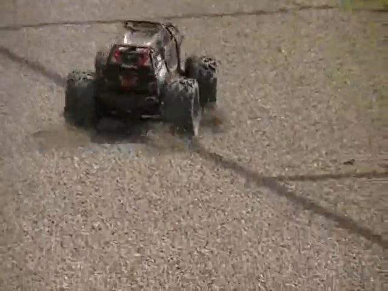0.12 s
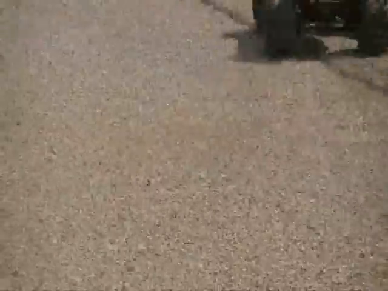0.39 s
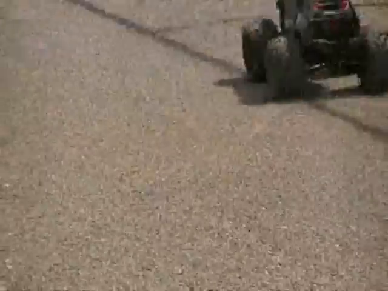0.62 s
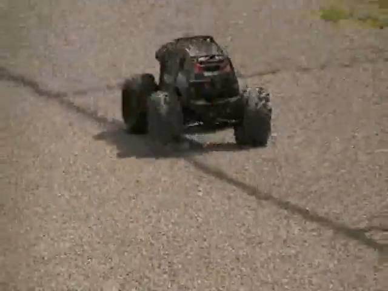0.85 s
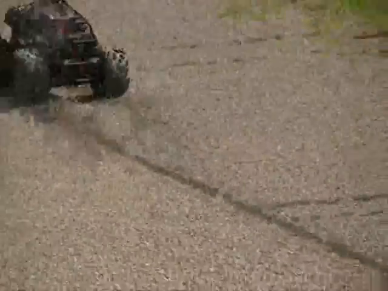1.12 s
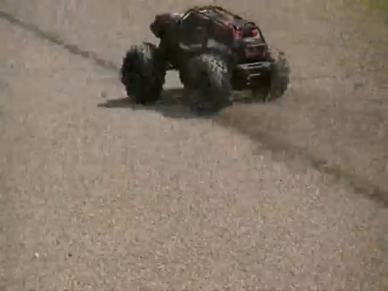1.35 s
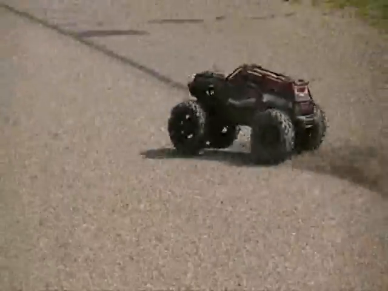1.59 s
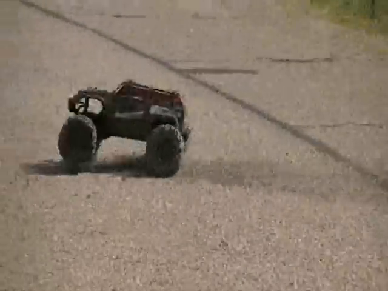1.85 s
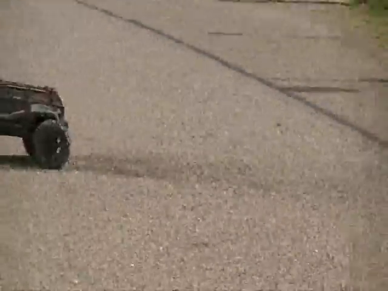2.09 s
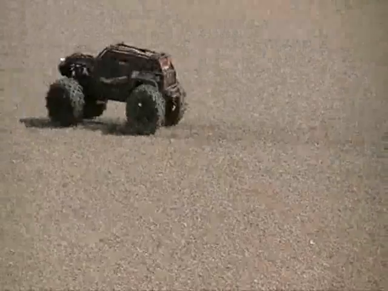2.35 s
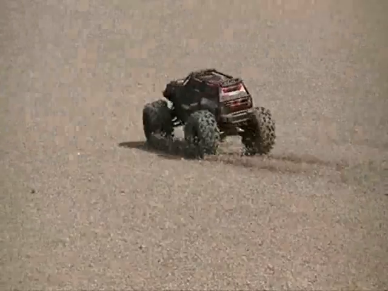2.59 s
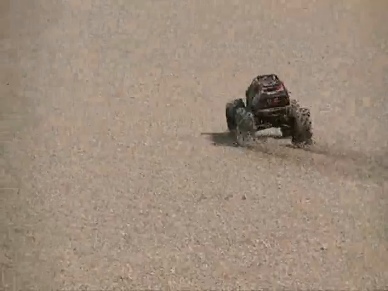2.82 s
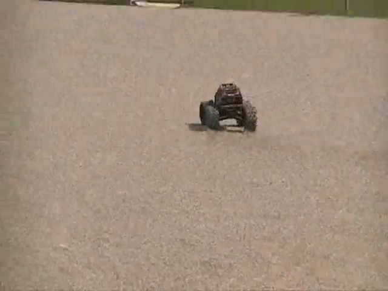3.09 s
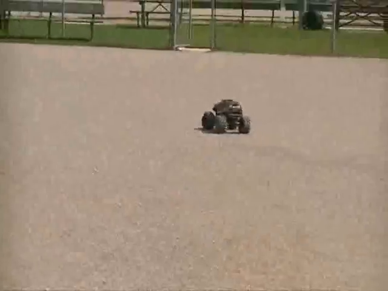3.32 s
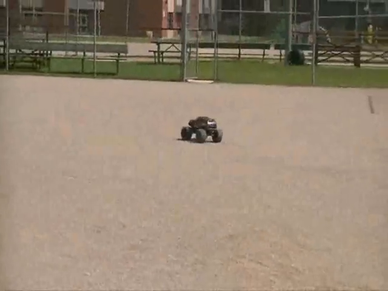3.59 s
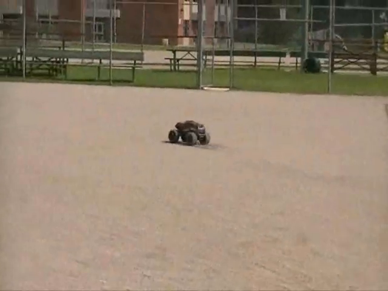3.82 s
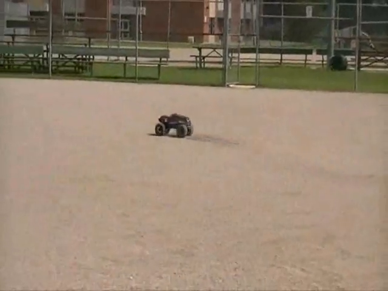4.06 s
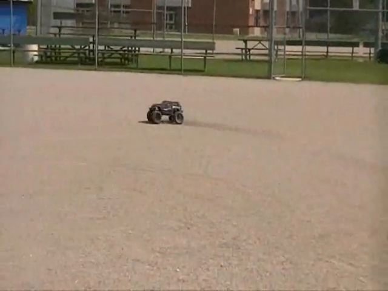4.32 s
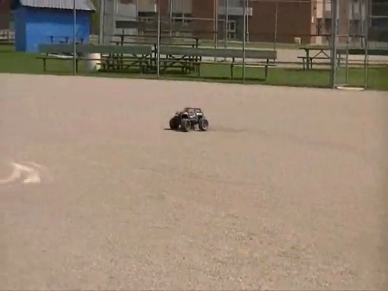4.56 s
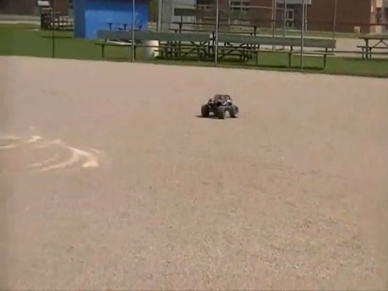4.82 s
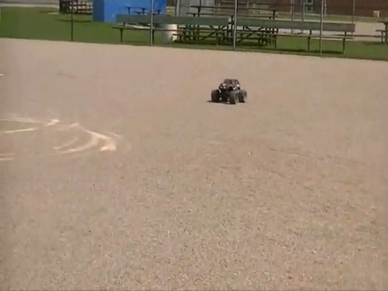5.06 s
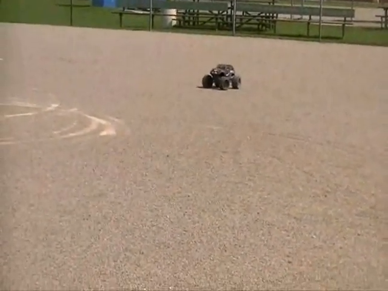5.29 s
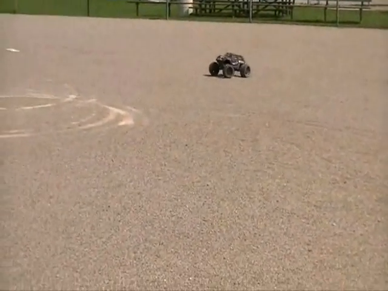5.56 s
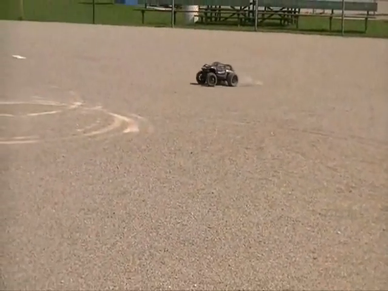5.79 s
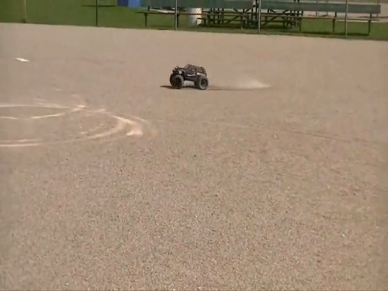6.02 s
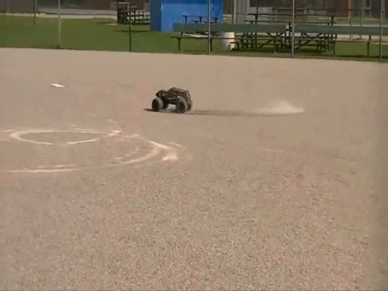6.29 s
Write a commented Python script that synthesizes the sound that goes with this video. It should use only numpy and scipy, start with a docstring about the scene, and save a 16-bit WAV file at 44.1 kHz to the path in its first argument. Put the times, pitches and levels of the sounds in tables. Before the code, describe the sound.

Outdoors on gravel, centred mono, with faint town hum and soft low wind. Two or three thin cricket chirps open the scene. At 0.1 s a remote-controlled truck spurts: its gear whine leaps upward over sudden tyre crunch, then drops by 0.45 s into quiet coasting, with stone ticks near 0.6 s and small thuds around 0.8 s. At 1 s it pulls away again, the whine stepping up to a bright, buzzing scream, loudest and closest near 2 s. At 2.9 s it eases off; a sharp stone strike lands at 3.1 s and the whine throbs lower, with chirps between. Another spurt runs 3.9-4.3 s with soft bumps, then slows and fades to sparse crunch, chirps and faint whistle by 5.5 s. From 5.65 s it accelerates again with growling body rattles, gritty spray and high wavering whine, cut off still running at 6.4 s.

```python
"""Cricket chirps over a distant town hum, then a remote-controlled truck spurts and coasts over gravel.
It pulls away again at about 1 s, is nearest at 2 s, then leaves, with spurts from 3.9 and 5.6 s.
Gear teeth make a harmonic whine that throbs once per turn of the large gear. Clicks coloured by filters
make the crunch and spray of the tyres; noise bursts make stone strikes and, near 5.7 s, growling body
rattles; sines make thuds. Gusts buffet the microphone now and then; both channels are the same."""
import sys
import numpy as np
from scipy import signal
from scipy.fft import rfft, irfft
from scipy.io import wavfile
from scipy.ndimage import uniform_filter1d

SR = 44100
rng = np.random.default_rng(int(sys.argv[2]) if len(sys.argv) > 2 else 0)


def int16_out(signal):
    """Quantize to a 16-bit WAV file."""
    q = np.round(np.clip(np.atleast_2d(signal).T, -1, 1) * 32767)
    wavfile.write(sys.argv[1], SR, q.astype(np.int16))


def gain_from_decibels(decibels):
    """Convert decibel values to linear amplitude factors."""
    exponent = np.asarray(decibels, float) / 20
    return 10 ** exponent


N = 282681
T = np.arange(N) / SR

# Motor. Each row: time in seconds, tooth rate in Hz, whine of the upper harmonics in dB.
MOTOR = [(0, 1310, -85), (.11, 1340, -69), (.165, 1800, -50), (.21, 2140, -57), (.27, 2266, -57),
         (.297, 2800, -50), (.32, 2570, -37), (.36, 2520, -45), (.4, 2125, -55), (.42, 1680, -64),
         (.5, 1694, -66), (.9, 1560, -75), (.98, 2380, -39), (1.02, 2110, -58), (1.058, 2182, -58),
         (1.095, 2890, -33), (1.135, 2535, -46), (1.16, 3450, -42), (1.2, 2876, -65), (1.3, 3584, -32),
         (1.34, 3300, -39), (1.385, 3690, -35), (1.41, 3550, -30), (1.44, 3750, -28), (1.54, 3640, -30),
         (1.58, 3870, -28.5), (1.65, 3750, -32.5), (1.9, 3960, -33.5), (1.93, 3740, -29),
         (1.965, 4155, -28.5), (2.01, 3790, -31), (2.06, 3826, -32), (2.11, 3490, -34), (2.28, 3500, -36.5),
         (2.42, 3790, -33), (2.62, 3994, -36), (2.85, 3615, -39.5), (2.9, 2776, -49), (3.08, 2574, -48),
         (3.17, 2450, -36), (3.36, 2305, -48.5), (3.47, 2290, -39), (3.65, 2268, -42.5), (3.69, 2280, -64),
         (3.85, 2290, -67), (3.89, 2960, -54), (3.92, 3330, -42), (4.04, 3360, -45), (4.11, 3674, -37),
         (4.21, 3810, -40), (4.25, 3620, -38), (4.3, 2686, -52), (4.37, 2530, -44.5), (4.44, 2383, -44),
         (4.55, 2206, -54), (4.7, 1815, -43), (4.9, 1632, -68), (5.55, 1520, -76), (5.655, 2290, -58),
         (5.69, 2300, -58), (5.72, 2595, -43), (5.755, 2630, -43), (5.77, 2885, -62), (5.79, 3350, -34),
         (5.825, 3084, -52), (5.86, 3430, -39), (5.9, 3390, -43), (5.93, 3840, -38), (6.05, 3813, -37),
         (6.14, 4087, -35.5), (6.23, 3546, -44), (6.33, 4116, -37.5), (6.37, 3920, -40), (6.41, 3940, -43)]
# Trigger pulls. Each row: on in seconds, off in seconds.
TRIGGER_PULLS = [(.11, 0.62), (.97, 2.87), (3.86, 4.28), (5.64, 7.05)]
# How hard the tyres work the gravel. Each row: time in seconds, level in dB.
TYRE_WORK = [(0, -76), (.07, -54), (.16, -29.5), (.36, -30.5), (.46, -38), (.52, -43), (.59, -40.5),
             (.61, -45), (.71, -48), (.75, -43.5), (.87, -50), (.96, -43), (1.02, -31.5), (2, -32.5),
             (2.36, -36), (2.6, -33), (2.87, -35), (3.11, -37), (3.21, -42), (3.82, -43), (3.93, -35.5),
             (4.12, -35.5), (4.37, -37.5), (4.96, -41.5), (5.18, -50), (5.44, -53), (5.62, -46),
             (5.67, -36), (6, -34), (6.25, -34.5), (6.41, -34)]
# Distance of the truck, which dulls hiss and spray. Each row: time in seconds, distance in metres.
DISTANCE = [(0, 5.6), (2, 1.5), (3.3, 7.66), (5, 10.3), (6.41, 9.7)]

# Upper tooth harmonics. Each row: multiple of the tooth rate, relative level in dB.
TOOTH_HARMONICS = [(2, 0), (3, 0), (4, -4), (5, -9)]
# Gearbox casing, favouring harmonics near its main resonance. Each row: frequency in Hz, gain in dB.
CASING = [(3000, -30), (5800, -24), (6700, -4), (7500, 0), (8300, -3), (9200, -14), (11500, -16),
          (13000, -22), (15500, -16)]
# How well the body radiates the tooth tone. Each row: frequency in Hz, gain in dB.
RADIATES_TOOTH = [(1200, -6), (1550, 3), (1700, -5), (1850, 0), (2000, -11), (2130, -6), (2300, -10),
                  (2600, -14.5), (2800, -10), (3080, -22), (3250, -11), (3550, -16), (3750, -19.5),
                  (3900, -21.5), (4300, -22)]
# How well it radiates the second gear pair. Each row: frequency in Hz, gain in dB.
RADIATES_SECOND = [(300, -27), (500, -38), (585, -2), (680, -22), (850, -18), (930, -6), (1000, -8.5),
                   (1100, -9.5)]
# How well it radiates that pair's third harmonic. Each row: frequency in Hz, gain in dB.
RADIATES_OVERTONE = [(900, -25), (1450, -16), (1700, -7), (1900, -24), (2100, -5.5), (2300, -10),
                     (2480, -7), (2600, -20), (2800, -20), (3000, -19), (3400, -19)]
# The tooth tone sings out. Each row: centre in seconds, added peak in dB, half length in seconds.
TOOTH_SINGS = [(.135, -36, .01), (.165, -38, 0.01), (.21, -26, 0.01), (.24, -29, 0.009), (.33, -33, 0.039),
               (.405, -30.5, .015), (.99, -35, 0.011), (1.04, -39, 0.025), (1.095, -38, 0.011),
               (1.19, -39, 0.03), (1.29, -47, 0.038), (1.4, -35.5, 0.047), (1.53, -39, 0.042),
               (1.84, -39.5, 0.033), (1.985, -40, 0.018), (2.25, -43, 0.14), (2.58, -43, 0.083),
               (3.9, -45, 0.038), (4.01, -48, 0.024), (4.2, -53, 0.062), (5.655, -39, 0.009),
               (5.74, -35, 0.025), (5.825, -36, 0.016), (5.87, -60, 0.014), (6, -44, 0.084)]
# The second pair swells as tyres grip. Each row: centre in seconds, added peak in dB, half length in seconds.
TYRE_GRIPS = [(1.42, -42, 0.041), (1.7, -41.5, 0.3), (2.02, -38.5, .08), (2.25, -48, 0.046),
              (2.47, -40, 0.11), (6.02, -53, 0.054), (6.15, -37.5, .04), (6.33, -37, .04)]

# Modes of the plastic shell. Each row: frequency in Hz, width in Hz, level under the crunch in dB.
SHELL_MODES = [(600, 185, 2), (1094, 180, -8), (1267, 170, -8.5), (1706, 215, -1), (2220, 220, -6),
               (2410, 320, -26), (2830, 57, -13.5)]
# Colour of the gravel crunch. Each row: frequency in Hz, relative level in dB per Hz.
CRUNCH_COLOUR = [(200, 2.5), (400, -1), (1000, -0.5), (2500, -6.5), (4000, -22), (8000, -27.5)]
# Colour of the hiss. Each row: frequency in Hz, relative level in dB per Hz.
HISS_COLOUR = [(2500, 5.5), (3500, 5), (5000, 6.5), (7500, 5), (9000, 6), (11000, 4), (15000, -5)]
# Colour of the grit spray. Each row: frequency in Hz, relative level in dB per Hz.
SPRAY_COLOUR = [(3000, -45), (6500, -5), (8500, -4), (10500, 0), (12000, -4), (14000, -8), (16000, -11)]
# Colour of the chassis rumble. Each row: frequency in Hz, relative level in dB per Hz.
RUMBLE_COLOUR = [(50, -33), (90, -9.5), (130, -5), (200, 1), (320, 0.5), (500, -39)]
# Grit off spinning tyres. Each row: centre in seconds, added peak in dB, half length in seconds.
GRIT_SPURTS = [(.16, -50, 0.016), (.36, -63, 0.027), (.765, -56, 0.015), (1, -33.5, 0.013), (1.5, -41, .02),
               (2.65, -45, 0.03), (2.77, -41, 0.024), (3.11, -52, 0.024), (3.59, -49, 0.1),
               (3.93, -47, 0.026), (4.13, -49, 0.041), (5.2, -56, 0.024), (5.31, -51.5, 0.042),
               (5.67, -38.5, 0.038), (5.83, -38.5, 0.074), (6, -40, 0.021), (6.18, -43, 0.035),
               (6.39, -61, .03)]
# Wheels jolting over ruts. Each row: centre in seconds, added peak in dB, half length in seconds.
WHEEL_JOLTS = [(0, -59, .03), (.165, -42, 0.029), (.46, -49, 0.025), (.75, -58, .03), (.84, -42, 0.012),
               (2.79, -49.5, 0.081), (3.03, -39.5, 0.036), (4.03, -51, 0.047), (5.37, -48, 0.019),
               (5.55, -49, 0.047), (5.77, -44, 0.056), (6, -53, 0.058), (6.34, -42.5, 0.037)]
# Stone strikes, and at 5.68-5.83 s narrow growling rattles of the body, before the shell rings.
# Each row: start in seconds, peak in dB, centre in Hz, 60 dB decay of the raw noise in seconds,
# half-width in octaves.
STRIKES_AND_RATTLES = [(0.5728, -22, 2750, 0.016, 0.85), (0.59, -17, 3300, 0.01, 0.93),
                       (.985, -24.5, 2450, 0.015, 1.3), (2.864, -16.5, 5500, 0.02, 0.96),
                       (2.889, -23, 4980, .02, 0.77), (3.1105, -10.5, 1710, 0.024, 1.48),
                       (4.486, -28, 6500, .02, 0.48), (5.128, -32, 3965, 0.019, 0.65),
                       (5.685, -31, 1798, 0.053, 0.12), (5.784, -36, 1760, 0.09, 0.064),
                       (5.809, -29.5, 1770, 0.094, 0.24), (5.825, -30, 1590, 0.071, 0.056),
                       (6.19, -19, 6500, 0.03, 1.3), (6.308, -28, 5280, 0.019, .4),
                       (6.389, -24, 5570, 0.021, .4)]
# Chassis thuds; the envelope tops out about 6 dB below the level.
# Each row: start in seconds, level in dB, frequency in Hz.
CHASSIS_THUDS = [(0.76, -35.5, 118), (0.826, -30, 199), (2.996, -26, 204), (3.975, -26, 175),
                 (4.025, -29, 110), (5.372, -30.5, 189), (5.55, -37, 203)]

# Thin high whistle while the truck is slow. Each row: start in seconds, length in seconds, level in dB.
SLOW_WHISTLES = [(0, .15, -60), (.6, .1, -52), (.74, .07, -52), (4.93, .2, -60), (5.493, .18, -61)]
# Cricket. Each row: start in seconds, peak in dB, mid pitch in Hz.
CRICKET_CHIRPS = [(0.0468, -61, 4380), (0.0765, -44, 4600), (0.1156, -43, 4710), (3.095, -52, 4640),
                  (3.1388, -45, 4720), (3.4061, -49, 4550), (3.4423, -46, 4680), (4.2777, -45, 4630),
                  (4.8443, -51, 4510), (4.876, -48, 4580), (4.916, -48, 4650), (5.257, -47.5, 4590),
                  (5.299, -45, 4620)]
# Colour of wind on the microphone. Each row: frequency in Hz, relative level in dB per Hz.
WIND_COLOUR = [(18, 8), (40, 0), (70, 4), (100, -10)]
# Gusts on the microphone. Each row: centre in seconds, added peak in dB, half length in seconds.
WIND_GUSTS = [(.3, -68, .4), (1.02, -65, .15), (1.8, -58, .35), (2.7, -63, 0.23), (3.09, -68, .1),
              (4.1, -76, .3), (6.2, -65, .5)]
# Colour of the distant town. Each row: frequency in Hz, relative level in dB per Hz.
TOWN_COLOUR = [(18, -40), (30, -27.5), (133, -4), (225, -9.5), (897, -6.5), (6720, -24.5), (8500, -14),
               (9430, -30), (15500, -34)]

BIG_GEAR_TEETH, SMALL_GEAR_TEETH = 68, 23
SECOND_STAGE = .265  # tooth rate of the second gear pair over the first
SLACK_DRIVEN, SLACK_COASTING = .28, 1  # throb depth 0-1; coasting gears knock once a turn
THROTTLE_SLEW_S = 0.01
# layers over the tyre work: (driven dB, coasting dB)
TOOTH_DB, SECOND_DB, OVERTONE_DB = (-1, -12), (-8.5, -24), (1.5, -29)
HISS_DB, SPRAY_DB, RUMBLE_DB = (-2.5, -2.5), (-8, -2), (-14, -14)
SPURT_HISS_DB = -6.5  # hiss of a grit spurt against its spray
SPRAY_DB_PER_OCTAVE, FULL_SPEED_HZ = 6.5, 3800  # more spray with speed
HISS_LOSS_DB_PER_M, SPRAY_LOSS_DB_PER_M = 0.58, 2
WHISTLE_HZ, WHISTLE_RISE_HZ = 8700, 330
CALM_DB, TOWN_DB = -101, -52.5


def gears():
    """Tooth harmonics, shaken by slipping wheels and two eccentric gears; also returns the once-a-turn throb."""
    hz, upper_db = curves(MOTOR)
    first_db = over_work(TOOTH_DB) + shape_db(RADIATES_TOOTH, hz) + 4 * walk(60)
    first = gain_from_decibels(first_db) + swells(TOOTH_SINGS)
    second_db = over_work(SECOND_DB) + shape_db(RADIATES_SECOND, SECOND_STAGE * hz)
    overtone_db = over_work(OVERTONE_DB) + shape_db(RADIATES_OVERTONE, 3 * SECOND_STAGE * hz)

    hz = hz * (1 + .004 * walk(45) + .004 * walk(300))  # wheels slip
    teeth = np.cumsum(hz) / SR
    big = 2 * np.pi * teeth / BIG_GEAR_TEETH
    small = 2 * np.pi * teeth / SMALL_GEAR_TEETH
    slack = SLACK_COASTING + (SLACK_DRIVEN - SLACK_COASTING) * throttle()
    depth = np.clip(slack * (1 + 0.11 * walk(18)), 0, 1)
    throb = (1 + depth * np.cos(big + 0.05)) ** 1.2 / (1 + .8 * slack)

    # run-out of each gear swings the mesh phase and load
    phase = 2 * np.pi * teeth + 0.3 * np.sin(big) + 0.22 * np.sin(small)
    load = throb * (1 + 0.36 * np.cos(small))
    tone = first * gain_from_decibels(3.5 * walk(110)) * np.sin(phase)
    # each tooth lands a little early or late, which smears the upper harmonics into bands
    scatter = phase + .6 * walk(300) + .35 * walk(700)
    for k, db in TOOTH_HARMONICS:
        flicker_db = 3.3 * walk(150) + k * walk(30) * 0.5
        harmonic_db = upper_db + db + shape_db(CASING, k * hz) + flicker_db
        tone = tone + gain_from_decibels(harmonic_db) * np.sin(k * scatter)
    second = second_pair(SECOND_STAGE * phase, second_db, overtone_db)
    return np.sqrt(2) * (load * tone + second), throb


def second_pair(phase, second_db, overtone_db):
    """The slower gear pair: three harmonics of one wandering phase, louder as the tyres grip."""
    slow = phase + .7 * walk(90)
    tone = (gain_from_decibels(second_db) + swells(TYRE_GRIPS)) * gain_from_decibels(1.7 * walk(40)) * np.sin(slow)
    tone = tone + gain_from_decibels(overtone_db - 11.0 + 4.24 * walk(30)) * np.sin(2 * slow)
    return tone + gain_from_decibels(overtone_db + 1.8 * walk(60)) * np.sin(3 * slow)


def crunch(throb):
    """Rolling stones click against each other and ring the plastic shell."""
    work_db, = curves(TYRE_WORK)
    stones_rolling = grains(9000., 1.28)
    gravel = unit(colour(stones_rolling, CRUNCH_COLOUR) + shell(stones_rolling, patchy_db=1.5))
    return gravel * gain_from_decibels(work_db + 0.14 * walk(24.9)) * throb ** 0.065


def shell(x, patchy_db):
    """Modes of the plastic body; each one is rattled harder at its own moments."""
    out = 0
    for hz, width, db in SHELL_MODES:
        mode = unit(signal.lfilter(*signal.iirpeak(hz, hz / width, SR), x))
        out = out + gain_from_decibels(db + patchy_db * walk(21.85)) * mode
    return out


def hiss(throb):
    """Gears hiss in slight throbs: dense clicks, weaker with distance, stronger in grit spurts."""
    metres, = curves(DISTANCE)
    gain = gain_from_decibels(over_work(HISS_DB) - HISS_LOSS_DB_PER_M * metres) + gain_from_decibels(SPURT_HISS_DB) * swells(GRIT_SPURTS)
    noise = patchy(colour(grains(15000., 1.6), HISS_COLOUR), 6700.0, 1.9)
    return noise * gain * gain_from_decibels(1.4 * walk(7.7)) * throb ** 0.15


def spray(throb):
    """Grit sprays in uneven clicks that throb with the gear, grow with speed and fade with distance."""
    metres, = curves(DISTANCE)
    octaves = np.log2(curves(MOTOR)[0] / FULL_SPEED_HZ)
    spray_db = over_work(SPRAY_DB) + SPRAY_DB_PER_OCTAVE * octaves - SPRAY_LOSS_DB_PER_M * metres
    gain = gain_from_decibels(spray_db) * throb ** 2.1 + swells(GRIT_SPURTS)
    noise = patchy(colour(grains(9000., 2.2), SPRAY_COLOUR), 12000.0, 1.7)
    return noise * gain * gain_from_decibels(1.4 * walk(14))


def rumble():
    """The chassis rumbles as low noise that follows the tyre work and swells when wheels jolt."""
    gain = gain_from_decibels(over_work(RUMBLE_DB)) + swells(WHEEL_JOLTS)
    return colour(rng.standard_normal(N), RUMBLE_COLOUR) * gain * gain_from_decibels(2.9 * walk(12))


def strikes_and_rattles():
    """Stones strike as wide noise bursts, the body rattles in narrow growling ones; the shell rings after."""
    out, t = np.zeros(N), T[:4000]
    for s, db, hz, t60, octaves in STRIKES_AND_RATTLES:
        burst = rng.standard_normal(len(t)) * np.exp(-np.log(1000) * t / t60)
        burst[0] = 6  # firm onset
        edges = np.clip([hz / 2 ** octaves, hz * 2 ** octaves], 200, 15000)
        burst = signal.sosfilt(signal.butter(2, edges, "band", fs=SR, output="sos"), burst)
        burst = burst + 0.35 * np.roll(burst, int(0.0028 * SR))  # quick bounce
        add(out, s, gain_from_decibels(db) * burst / np.abs(burst).max())
    ring = sum(signal.lfilter(*signal.iirpeak(hz, hz / width, SR), out) for hz, width, _ in SHELL_MODES)
    return out + .7 * ring


def thuds():
    """Soft low bumps of the chassis: sines that swell and die within milliseconds."""
    out, t = np.zeros(N), T[:6000]
    for s, db, hz in CHASSIS_THUDS:
        envelope = t / 0.0082 * np.exp(1 - t / 0.0042)
        add(out, s, gain_from_decibels(db) * np.sin(2 * np.pi * hz * t) * envelope)
    return out


def whistle():
    """Blurred high tones that rise in pitch."""
    out = 0
    for s, length, db in SLOW_WHISTLES:
        rise = [(s, WHISTLE_HZ, db), (s + length, WHISTLE_HZ + WHISTLE_RISE_HZ, db)]
        out = out + faint_tone(rise, 520., 0)
    return out


def coasting_hum():
    """A low, wavering hum while coasting."""
    return faint_tone([(3.1, 405, -50), (3.63, 405, -50)], 25.02, 3) / 4


def cricket():
    """Short near-pure chirps that sag in pitch."""
    out, t = np.zeros(N), T[:int(.022 * SR)]
    for s, db, hz in CRICKET_CHIRPS:
        envelope = np.sin(np.pi * t / t[-1]) ** 0.16
        add(out, s, gain_from_decibels(db) * envelope * np.sin(2 * np.pi * hz * t * (1.02 - 0.95 * t)))
    return out


def wind():
    """Gusts buffet the microphone as very low noise."""
    gain = gain_from_decibels(CALM_DB) + swells(WIND_GUSTS)
    return colour(rng.standard_normal(N), WIND_COLOUR) * gain * gain_from_decibels(0.97 * walk(5.4))


def town():
    """Distant town hum: coloured noise that slowly wanders in level."""
    return colour(rng.standard_normal(N), TOWN_COLOUR) * gain_from_decibels(TOWN_DB + 2.0 * walk(2.63))


def throttle():
    """0 coasting, 1 driven, with short ramps between."""
    on = sum(1. * (T > a) * (T < b) for a, b in TRIGGER_PULLS)
    return uniform_filter1d(on, int(THROTTLE_SLEW_S * SR))


def over_work(pair_db):
    """Level of a layer that follows the tyre work, differently when driven and coasting."""
    driven_db, coasting_db = pair_db
    return curves(TYRE_WORK)[0] + coasting_db + (driven_db - coasting_db) * throttle()


def swells(rows):
    """Bell-shaped gain for each (centre, peak, half length) row."""
    return sum(gain_from_decibels(db) * np.exp(-((T - s) / half) ** 2) for s, db, half in rows)


def patchy(x, split_hz, depth_db):
    """Let the lower and the upper part of a noise swell at their own moments."""
    low = signal.sosfilt(signal.butter(2, split_hz, fs=SR, output="sos"), x)
    return low * gain_from_decibels(depth_db * walk(27.77)) + (x - low) * gain_from_decibels(depth_db * walk(28))


def faint_tone(rows, blur_rate, steady):
    """A wavering narrow tone that fades in and out; rows of (s, Hz, dB)."""
    hz, db = curves(rows)
    gate = uniform_filter1d(1. * (T > rows[0][0]) * (T < rows[-1][0]), size=1500)
    return gate * gain_from_decibels(db) * (steady + walk(blur_rate)) * np.sin(2 * np.pi * np.cumsum(hz) / SR)


def grains(rate, spread_db):
    """Dense clicks of uneven size, on average rate per second."""
    size = gain_from_decibels(spread_db * rng.exponential(size=N)) * rng.standard_normal(N)
    return size * (rng.random(N) < rate / SR)


def walk(rate):
    """Random levels held 1 / rate s and slewed twice; spread near 1."""
    k = max(int(SR / rate), 1)
    held = np.repeat(rng.standard_normal(N // k + 1), k)
    return 1.275 * uniform_filter1d(uniform_filter1d(held, k), k)[:N]


def colour(x, points):
    """Filter by a (Hz, dB) spectrum; rms 1."""
    hz = np.maximum(np.arange(N // 2 + 1) * SR / N, 1)
    return unit(irfft(rfft(x) * gain_from_decibels(shape_db(points, hz)), N))


def shape_db(points, hz):
    """Read a (Hz, dB) spectrum at any frequencies; -80 dB outside it."""
    at, db = np.transpose(points)
    return np.interp(np.log(hz), np.log(at), db, -80, -80)


def curves(rows):
    """Draw each column after the first as a line over time."""
    s, *columns = np.transpose(rows)
    return [np.interp(T, s, c) for c in columns]


def unit(x):
    """Scale to rms 1."""
    return x / np.sqrt(np.mean(x ** 2))


def add(out, s, burst):
    """Mix a burst in at s seconds."""
    i = int(s * SR)
    out[i:i + len(burst)] += burst[:N - i]


def scene():
    """Truck, strikes, cricket, wind and town summed to mono on two equal channels."""
    whine, throb = gears()
    tyres = crunch(throb) + hiss(throb) + spray(throb) + rumble()
    truck = whine + tyres + strikes_and_rattles() + thuds() + whistle() + coasting_hum()
    mono = truck + cricket() + wind() + town()
    return np.array([mono, mono])


def roll_off(x):
    """The treble ends steeply here."""
    return signal.sosfilt(signal.butter(12, 16430, fs=SR, output="sos"), x)


def record(dry):
    """The camera cuts the top steeply above 15.8 kHz."""
    low_pass = signal.ellip(14, .3, 90, 15800, fs=SR, output="sos")
    mix = signal.sosfilt(low_pass, dry)
    return roll_off(mix)


dry = scene()
out = record(dry)
int16_out(out)
```